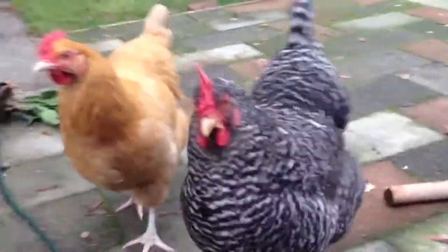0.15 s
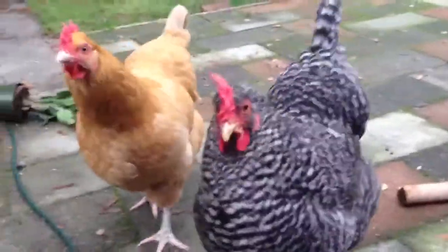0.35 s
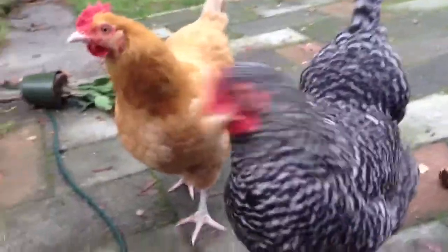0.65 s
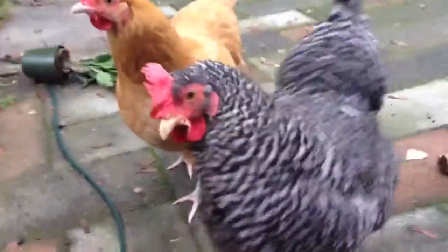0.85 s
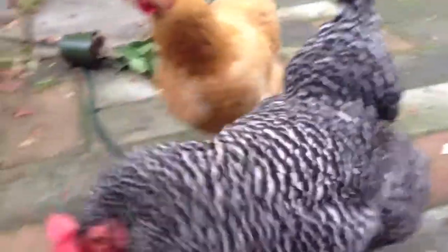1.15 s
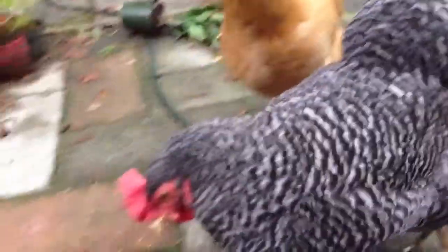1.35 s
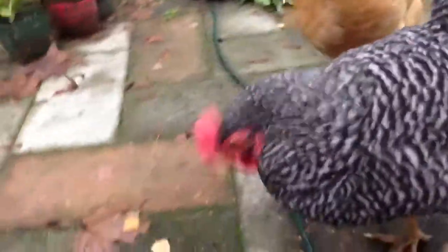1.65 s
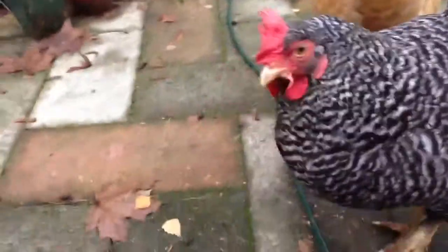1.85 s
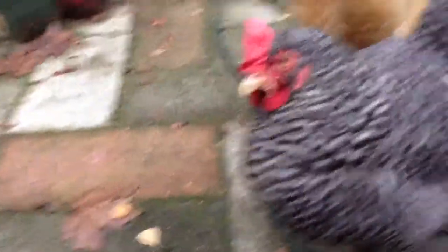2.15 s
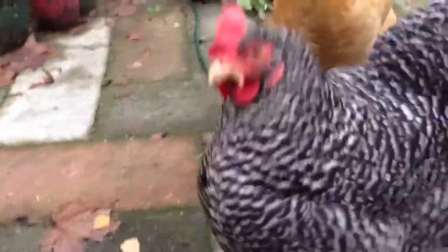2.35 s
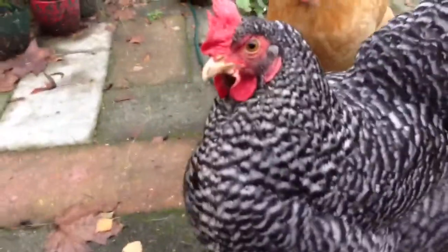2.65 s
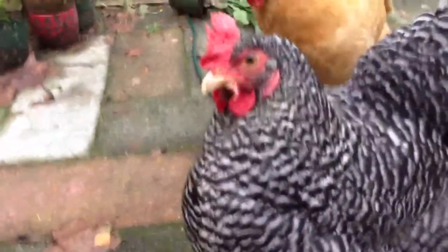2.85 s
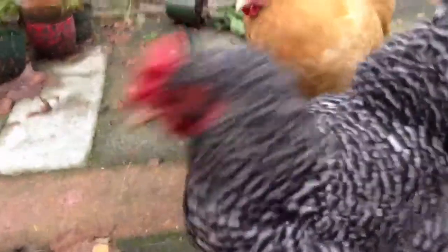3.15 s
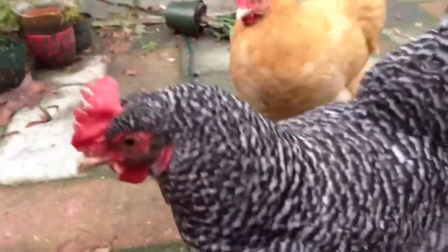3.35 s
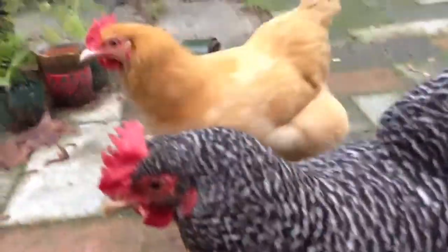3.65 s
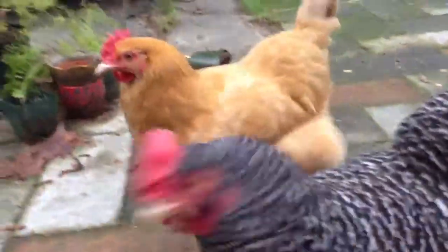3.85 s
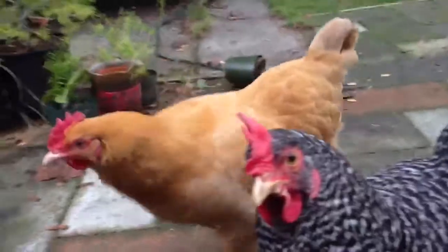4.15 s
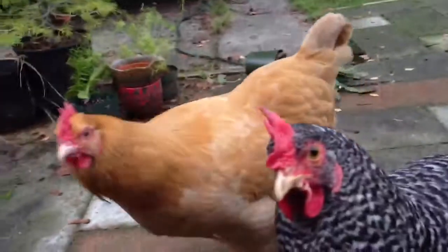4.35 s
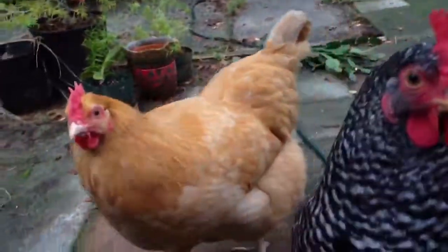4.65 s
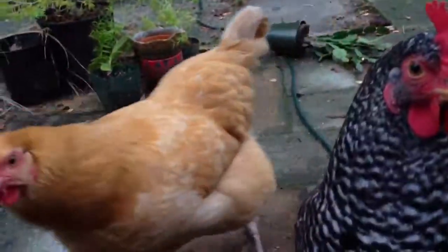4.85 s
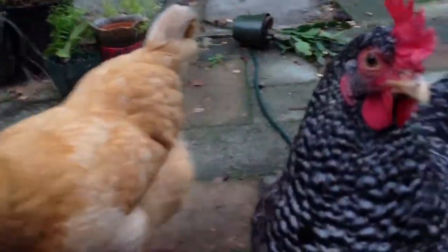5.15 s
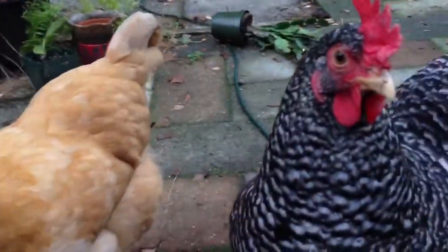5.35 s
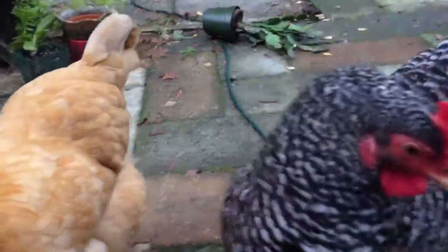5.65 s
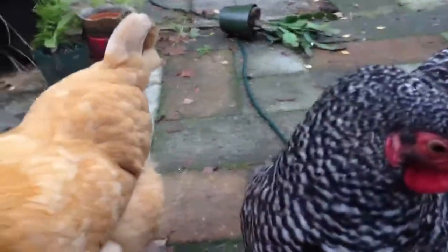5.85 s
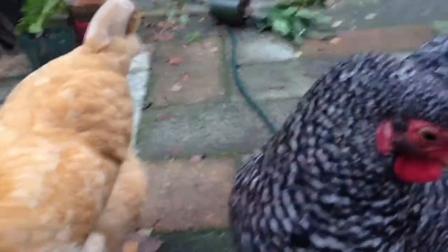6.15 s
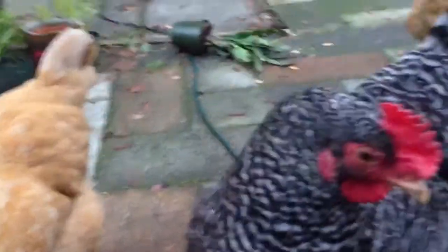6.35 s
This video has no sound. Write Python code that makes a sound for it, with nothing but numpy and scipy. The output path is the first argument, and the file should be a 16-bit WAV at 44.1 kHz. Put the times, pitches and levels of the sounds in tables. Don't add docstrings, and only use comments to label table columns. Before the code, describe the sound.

A close, slightly hissy outdoor sound with low distant traffic rumble throughout. At once a near hen gives a short croaky call of about 0.3 s, sinking, then leaping up and holding. Dry claw and beak ticks on stone follow, with a leaf scuff near 0.5 s, crisp taps around 0.85 s and a dull hollow knock at 1.2 s. From 1.7 to 2.4 s comes a longer croon: a soft warm-up, low creaky croak, voice break, rise and final upward flick, with beak snaps inside it. A faint bird chirp at 2.6 s and a deep soft thud at 2.7 s follow. Sparse ticks continue; from 4.1 to 5.3 s a far hen murmurs weakly, a distant car swells and scuffs cluster. At 5.67 s one hard, loud, breathy cluck snaps and echoes off walls. Quiet returns, with two tiny chirps near 6.2 s and a last tick.

```python
import sys
import numpy as np
from scipy import signal
from scipy.io import wavfile
from scipy.ndimage import uniform_filter1d

SR = 44100
rng = np.random.default_rng(int(sys.argv[2]) if len(sys.argv) > 2 else 0)


def waveform_to_disk(signal):
    frames = np.transpose(np.atleast_2d(signal))
    scaled = np.clip(frames, -1, 1) * 32767
    samples = np.round(scaled).astype(np.int16)
    wavfile.write(sys.argv[1], SR, samples)


def undo_db(level):
    steps = np.asarray(level, float) / 20
    return 10 ** steps


N = 286650


def rms_one(x):
    return x / np.sqrt(np.mean(x ** 2) + 1e-20)


def in_time(rows, first, last):
    s, *columns = np.transpose(rows)
    return [np.interp(np.arange(first, last) / SR, s, c) for c in columns]


def at_hz(points, hz):
    point_hz, point_db = np.transpose(points)
    return np.interp(np.log(hz), np.log(point_hz), point_db)


def drift(rate, size=N):
    r = np.exp(-2 * np.pi * rate / SR)
    return rms_one(signal.lfilter([1], [1, -2 * r, r * r], rng.standard_normal(size + SR))[SR:])


def band(x, low_hz, high_hz):
    edges = [low_hz, min(high_hz, 0.45 * SR)]
    return signal.sosfilt(signal.butter(2, edges, "band", fs=SR, output="sos"), x)


def noise_band(size, low_hz, high_hz):
    return rms_one(band(rng.standard_normal(size), low_hz, high_hz))


def coloured(spectrum, patchy_db, rate):
    out = 0
    edges = 30 * 2 ** np.arange(0, 9.2, 1 / 3)
    white = rng.standard_normal((2, N))
    together, own = drift(rate), drift(3 * rate)
    for k, (low, high) in enumerate(zip(edges, edges[1:])):
        flicker = 0.8 * together + np.roll(own, 9001 * k)
        level_db = at_hz(spectrum, np.sqrt(low * high)) + patchy_db * flicker
        out = out + undo_db(level_db) * band(white[k % 2], low, high)
    return rms_one(out)


def response(modes, hz, order):
    total = 0
    for mid, width, db in modes:
        total = total + undo_db(db) * (1j * hz * width / (mid ** 2 - hz ** 2 + 1j * hz * width)) ** order
    return total


def stack(phase, gains):
    k = np.arange(len(gains))[:, None] + 2
    power = np.sum(np.abs(gains) ** 2, axis=0) / 2
    return np.sum(gains * np.exp(1j * k * phase), axis=0).real / np.sqrt(power)


def held(rows, t, attack_s, release_s):
    start, length = np.array(rows)[:, :1], np.array(rows)[:, 1:2]
    return -20 * np.maximum(0, np.maximum((start - t) / attack_s, (t - start - length) / release_s))


def loudness(rows, t, attack_s, release_s, steady_db=-120):
    level_db = np.array(rows)[:, 2:3] + held(rows, t, attack_s, release_s)
    return np.sqrt(undo_db(steady_db) ** 2 + np.sum(undo_db(level_db) ** 2, axis=0))


def background():
    # (frequency [Hz], density [dB per Hz])
    rumble_colour = [(18, -72), (30, -76.5), (91, -15), (129, 3), (187, 4), (358, -4.5), (456, -5),
                     (737, -14.5), (1050, -15.5), (1460, -55), (2500, -34.5), (3250, -68.5), (5500, -120)]
    rustle_colour = [(1200, 3), (2500, 1.5), (4000, 4), (7000, 1.5), (12000, -3), (16000, -6)]
    hiss_colour = [(760, -35), (1300, -6), (2440, -12), (2710, 1), (4500, -1), (14500, 4), (15400, -9)]
    # (start [s], length [s], level [dB])
    swells = [(0, 0.81, -65.5), (1.45, 2.2, -64.5), (3.4, 0.47, -66.5), (5.35, 0.32, -66), (6.3, 0.23, -60)]
    stirs = [(0, 0.06, -66), (1.05, 0.23, -69), (2.9, 0.1, -75), (3.4, 0.13, -108)]
    hums = [(3.1, 0.43, -81.5), (4.06, 1, -82), (4.87, 0.427, -75.5), (5.44, 0.081, -74.5)]
    hum_hz, hum_width_hz = 1036, 14.5

    t = np.arange(N) / SR
    rumble = loudness(swells, t, 0.62, 0.62, steady_db=-63.5) * coloured(rumble_colour, patchy_db=1.5, rate=3.0)
    rustle = loudness(stirs, t, 0.12, 0.12, steady_db=-68.5) * coloured(rustle_colour, patchy_db=0.7, rate=9.0)
    hum = noise_band(N, hum_hz - hum_width_hz / 2, hum_hz + hum_width_hz / 2)
    hum = loudness(hums, t, 0.08, 0.08, steady_db=-89.5) * hum
    hiss = undo_db(-74) * coloured(hiss_colour, patchy_db=0.2, rate=8.0)
    return rumble + rustle + hum + hiss


def far_car():
    # (start [s], length [s], level [dB])
    passes = [
        (3.6, .3, -76.5),
        (4.5, .55, -70),
        (6.399, .1, -76),
    ]
    gain = loudness(passes, np.arange(N) / SR, 0.9, 0.9, steady_db=-83.5)
    return gain * rms_one(band(band(rng.standard_normal(N), 380, 1010), 292, 1100))


def far_bird():
    # (time [s], length [s], pitch [Hz], rms level [dB])
    chirps = [
        (2.591, 0.014, 6880, -70.5),
        (6.145, .018, 7150, -74),
        (6.297, 0.015, 7100, -67.5),
    ]
    out = np.zeros(N)
    for s, length, hz, level_db in chirps:
        t = np.arange(round(length * SR)) / SR
        note = np.sin(2 * np.pi * hz * t * (1 - 0.012 * t / length))
        out[round(s * SR):][:len(t)] += 2 * undo_db(level_db) * np.sin(np.pi * t / length) * note
    return out


def far_hen():
    # (time [s], length [s], start pitch [Hz], end pitch [Hz], rms level [dB])
    murmurs = [
        (4.134, 0.21, 475, 479, -76),
        (4.397, 0.14, 396, 402, -76.5),
        (4.87, 0.144, 413, 427, -72),
        (5.127, 0.17, 417, 438, -75),
    ]
    out = np.zeros(N)
    k = np.arange(6, 11)[:, None]
    for s, length, start_hz, end_hz, level_db in murmurs:
        hz = np.linspace(start_hz, end_hz, round(length * SR))
        hz = hz * (1 + 0.008 * drift(60.0, size=len(hz)))
        gains = np.abs(response([(3800, 1200, 0)], k * hz, order=2))
        note = np.sum(gains * np.cos(k * 2 * np.pi * np.cumsum(hz) / SR), axis=0)
        out[round(s * SR):][:len(hz)] += undo_db(level_db) * np.sqrt(np.hanning(len(hz))) * rms_one(note)
    return out


def scuffs():
    # (time [s], length [s], rms level [dB], centre [Hz], density [grains per s])
    showers = [(0.474, 0.051, -60.5, 3620, 10000), (1.53, 0.068, -70, 6450, 1700),
               (2.669, 0.047, -66.5, 6100, 2500), (4.104, 0.023, -66, 3300, 3600),
               (4.708, 0.037, -58.5, 4060, 4100), (4.737, 0.038, -60, 4500, 1700),
               (4.8, 0.012, -67.5, 4430, 3500), (5.058, 0.021, -58, 4600, 4400),
               (5.073, 0.019, -57, 4570, 8100)]
    out = np.zeros(N)
    t = np.arange(4000) / SR
    for s, length, level_db, hz, per_s in showers:
        sizes = rng.choice([-1, 1], len(t)) * undo_db(4 * np.minimum(rng.exponential(1, len(t)), 2.5))
        clicks = sizes * (rng.random(len(t)) < per_s / SR)
        grains = band(clicks, hz / 1.15, hz * 1.2)
        grains += 0.3 * band(clicks, hz / 1.9, hz / 1.5)
        grains += 0.45 * band(clicks, hz / 2.2, hz * 1.8)
        out[round(s * SR):][:len(t)] += undo_db(level_db) * np.exp(-(t / length) ** 2) * rms_one(grains)
    return out


def ticks():
    # (time [s], peak level [dB], centre [Hz], width [share of centre], T60 [s]) claws and beaks on stone,
    # some of them during the second croon, then duller knocks
    stone_ticks = [(0.011, -41.5, 6950, 0.34, 0.01), (0.078, -54, 7000, .5, .006),
                   (0.484, -51, 4440, .5, .006), (0.5633, -51, 4300, 0.54, 0.028),
                   (0.6667, -52, 3660, 0.9, 0.0065), (0.851, -40.5, 6000, 0.7, 0.0075),
                   (0.8614, -44, 6500, 0.98, 0.0052), (1.5298, -50, 5960, 0.82, 0.006),
                   (1.555, -50.5, 4750, 0.99, 0.007), (2.6494, -55, 7600, 0.98, 0.0066),
                   (2.674, -63, 6300, 1, 0.0066), (2.692, -44.5, 5700, 0.74, 0.0041),
                   (2.922, -49, 4480, 0.57, 0.006), (3.021, -51, 6860, 0.57, 0.01),
                   (3.7938, -48, 4400, 0.34, 0.005), (4.109, -54, 3370, 0.59, 0.006),
                   (4.5918, -49.5, 4520, .09, 0.014), (4.5918, -53, 2820, .2, .012),
                   (4.7094, -51, 4900, .3, 0.0073), (4.7155, -48, 4110, 0.24, .012),
                   (4.743, -47, 4620, .1, 0.018), (4.7907, -55, 3200, .4, .006),
                   (4.921, -59.5, 2500, .12, .015), (5.0795, -50, 4440, .12, .014),
                   (5.081, -54, 2720, .12, .016), (4.751, -45, 3560, 0.28, 0.0053),
                   (5.0614, -48.5, 4700, .1, .02), (5.1492, -52, 3900, .3, .006),
                   (5.18, -49, 7900, .12, .008), (5.1803, -48, 4000, 0.55, .004),
                   (5.3627, -54, 4800, .12, .01), (6.358, -53, 4750, 0.9, 0.0045),
                   (1.988, -49, 7260, 0.7, 0.0068), (2.0018, -46.5, 7043, 0.38, 0.024),
                  (2.0787, -44, 6550, 0.62, 0.017), (2.177, -34.5, 6435, 0.52, 0.0027),
                  (2.222, -46.5, 5500, 0.36, 0.0061), (2.239, -46, 7080, 0.7, 0.005)]
    knocks = [
        (2.7, -44, 140, .9, .07),
        (1.2, -46, 760, 0.27, 0.025),
        (5.647, -41, 1700, .3, 0.014),
    ]
    out = np.zeros(N)
    t = np.arange(1500) / SR
    for s, peak_db, hz, width, t60 in stone_ticks + knocks:
        spread = 1 + np.clip(width, 0.05, 3)
        crack = rng.standard_normal(len(t)) * undo_db(-60 * t / max(t60, 0.001))
        crack = band(crack, hz / spread, hz * spread)
        out[round(s * SR):][:len(t)] += undo_db(peak_db) * crack / np.abs(crack).max()
    return out


def yard(x):
    # (delay [s], level [dB], smear [s], centre [Hz])
    echoes = [(.004, -19.5, .001, 3080), (.004, -21.5, .001, 4600), (.1, -43, .008, 3000),
              (.15, -47.5, .008, 2980), (0.012, -29.5, 0.0027, 1690), (0.015, -32.5, .006, 4200),
              (0.032, -33, .004, 1870), (0.038, -48.5, 0.0041, 1100), (0.043, -30.5, 0.0049, 2490),
              (0.07, -50, .005, 4000), (.075, -37, .005, 2600), (0.13, -59, 0.0055, 1310),
              (.02, -26, .005, 503), (.058, -39.5, .006, 4100), (.085, -54.5, 0.0071, 1000),
              (.11, -51, .008, 4500), (.135, -45.5, .006, 3000)]
    t = np.arange(SR // 2) / SR
    reply = (rng.random(len(t)) < 9000 / SR) * rng.standard_normal(len(t))
    reply = reply * (t > 0.009) * undo_db(-60 * t / 0.18)
    reply = undo_db(-13) * reply / np.sqrt(np.sum(reply ** 2))
    reply -= 0.46 * band(reply, 850, 1070)
    far = band(rng.standard_normal(len(t)) * (t > 0.05) * undo_db(-60 * t / 0.68), 1300, 5500)
    reply += undo_db(-35.5) * far / np.sqrt(np.sum(far ** 2))
    for delay, level_db, smear, hz in echoes:
        echo = rng.standard_normal(600) * np.exp(-np.arange(600) / SR / smear)
        echo = band(echo, hz / 1.33, hz * 1.13)
        reply[round(delay * SR):][:600] += undo_db(level_db) * echo / np.sqrt(np.sum(echo ** 2))
    return signal.fftconvolve(x, band(reply, 180, 6600))[:N]


def beak_puff():
    # (start [s], length [s], level [dB])
    puffs = [
        (5.6455, 0.0066, -46.5),
        (5.654, 0.012, -51),
        (5.668, 0.021, -37),
    ]
    whistles = [
        (5.656, 0.01, -46.5),
        (5.668, 0.0073, -44),
        (5.682, 0.014, -47.5),
    ]
    first, last = round(5.635 * SR), round(5.73 * SR)
    size, t = last - first, np.arange(first, last) / SR
    whistle_hz = 9340 - 38000 * np.maximum(t - whistles[0][0], 0)
    whistle = drift(620.0, size=size) * np.cos(2 * np.pi * np.cumsum(whistle_hz) / SR)
    broad = noise_band(size, 1300, 4700) + undo_db(-21) * noise_band(size, 7000, 16000)
    out = np.zeros(N)
    out[first:last] += loudness(puffs, t, 0.0011, 0.022) * broad
    out[first:last] += loudness(whistles, t, 0.0076, 0.0076) * whistle
    return out


def cluck():
    # (time [s], pitch [Hz], level [dB])
    course = [(5.6605, 515, -57), (5.664, 509, -22), (5.667, 521, -17), (5.6705, 510, -11.5),
              (5.674, 499, -13), (5.678, 474, -14), (5.682, 470, -33.5), (5.687, 470, -54)]
    # (frequency [Hz], level [dB])
    colour = [(240, -46), (400, -8), (499, -12), (985, 3.5), (1090, 10.5), (1540, -4), (2050, -4),
              (2430, -9), (2750, -15.5), (3000, -3.5), (3780, -7.5), (4550, -1.5), (5000, -8), (6060, -15),
              (7060, -53), (9190, -23), (11000, -63), (14300, -80), (22000, -120)]
    beak_closes_s, closing_db_per_s = 5.676, 450

    first, last = round(course[0][0] * SR), round(course[-1][0] * SR)
    hz, level_db = in_time(course, first, last)
    level_db = uniform_filter1d(level_db, size=90)
    k = np.arange(1, 24)[:, None]
    tilt_db = 0.16 * np.clip(k - 2, 0, 8) * (level_db - level_db.max())
    closing = np.maximum(np.arange(first, last) / SR - beak_closes_s, 0)
    tilt_db -= closing_db_per_s * closing * np.clip(k - 4, 0, 8)
    lag = 0.05 * k + 0.034 * k ** 2
    phase = 2 * np.pi * np.cumsum(hz) / SR
    pulses = np.sum(undo_db(at_hz(colour, k * hz) + tilt_db) * np.cos(k * phase - lag), axis=0)
    husk = 0.22 * noise_band(last - first, 1120, 1430)
    out = np.zeros(N)
    out[first:last] = undo_db(level_db - 10.0) * (pulses + husk)
    return out


def breath(pushes, t):
    level_db = np.array(pushes)[:, 2:3] + held(pushes, t, attack_s=0.0053, release_s=0.007)
    tight_db, beak_db = np.array(pushes)[level_db.argmax(axis=0), 3:].T
    return uniform_filter1d([level_db.max(axis=0), tight_db, beak_db], size=200)


def croon(pitch, pushes):
    # (start [s], end [s], extra roughness [0-1])
    creaks = [(0.191, 0.244, 0.2), (1.79, 1.826, 0.25), (2.1, 2.145, 0.3), (2.145, 2.2, .35)]
    # (centre [Hz], width [Hz], level [dB])
    beak_modes = [(1455, 280, 6), (1645, 125, 11), (1850, 310, 10.5), (2520, 270, 3), (3150, 200, 8.5),
                  (3500, 620, 11), (3860, 230, 0.5), (6000, 350, -4), (8050, 3600, -11)]

    first, last = round(pitch[0][0] * SR), round(pitch[-1][0] * SR)
    size, t = last - first, np.arange(first, last) / SR
    hz, = uniform_filter1d(in_time(pitch, first, last), size=150)
    octaves = np.log2(hz / 250)

    throat_db, tight_db, beak_db = breath(pushes, t)
    chest_db = throat_db - 9 - tight_db
    rasp_db = throat_db - 27 + beak_db
    mouth_db = -19.5 + 0.99 * tight_db + 0.75 * beak_db + 7.7 * octaves
    mouth_db += 25 * uniform_filter1d(1.0 * ((t > 1) & (t < 1.745)), size=400)

    creak = uniform_filter1d(sum(more * ((t > a) & (t < b)) for a, b, more in creaks), size=400)
    usual_rough = 0.21
    rough = usual_rough + 0.13 * np.clip((255 - hz) / 20, 0, 1) + creak
    phase = 2 * np.pi * np.cumsum(hz * (1 + 0.018 * rough * drift(80.0, size=size))) / SR
    strength = undo_db(1.8 * rough * drift(70.0, size=size))
    strength *= 1 + 0.3 * creak * np.cos(phase / 2)

    partials = hz * np.arange(2, 36)[:, None]
    tract = response([(745, 95, 0), (1120, 380, mouth_db)], partials, order=1)
    throat = stack(phase, tract * (partials / 760) ** -0.8 / (1 + (partials / 970) ** 7.2))

    scatter = 2 * np.pi * np.cumsum(hz * 0.009 * drift(150.0, size=size)) / SR
    gap = 1 - response([(2204, 170, 0)], partials, order=1)
    gap *= 1 - response([(2800, 140, 0)], partials, order=1)
    upper_beak = (4400, 540, 1.4 + 6.0 * octaves)
    rasp = stack(phase + scatter, gap * response(beak_modes + [upper_beak], partials, order=2))

    gate = (0.5 + 0.5 * np.cos(phase - 1.0)) ** 2
    white = rng.standard_normal(size)
    air = band(band(white, 2980, 4100), 3130, 4400) + 0.91 * band(band(white, 1400, 1950), 1250, 2200)
    hiss = rms_one(air * gate)
    throat_husk = rms_one(band(band(white, 620, 950), 200, 1160))
    chest_husk = 0.035 * rough / usual_rough * rms_one(band(band(white, 160, 450), 140, 500))

    out = np.zeros(N)
    out[first:last] = undo_db(chest_db) * (np.sqrt(2) * strength * np.cos(phase) + chest_husk)
    out[first:last] += undo_db(throat_db) * (strength * throat + (0.49 * rough + 0.091 * creak) * throat_husk)
    out[first:last] += strength * undo_db(rasp_db) * (0.88 * rasp + (0.25 + 0.3 * rough) * hiss)
    return -out


def first_croon():
    # (time [s], pitch [Hz])
    fall = [(0.0, 345.5), (0.03, 389.3), (0.098, 364.8), (0.11, 333.5), (0.126, 343), (0.16, 271.9),
            (0.184, 283.5), (0.192, 291)]
    leap = [(0.195, 387), (0.213, 404), (0.225, 368), (0.232, 407.5), (0.238, 371), (0.25, 388.5),
            (0.275, 380)]
    # (start [s], length [s], effort [dB], throat tightness [dB], beak opening [dB])
    pushes = [(0, 0.018, -28, 8, -1.5), (0.022, .013, -30, 8, 3.5), (0.035, 0.025, -30.5, 1.5, 0),
              (0.054, 0.0223, -29.5, 2, 1.5), (0.078, 0.012, -30, 9, -6), (0.096, 0.01, -28.5, 12, -6),
              (0.105, 0.017, -32.5, 8, -2), (0.125, 0.019, -30.5, 21, -1), (0.147, 0.035, -33, -1.5, 8),
              (0.186, .01, -36, 8, -5), (0.199, 0.0083, -28.5, 3, -7), (0.214, 0.008, -32, -4, -1),
              (0.216, .004, -31.5, 7, -5), (0.224, 0.0072, -25.5, 7.5, -3.5), (0.235, 0.016, -30.5, 1.5, 3)]
    return croon(fall + leap, pushes)


def second_croon():
    # (time [s], pitch [Hz])
    warm_up = [(1.66, 238), (1.686, 243.2), (1.705, 287), (1.726, 295.3), (1.74, 257.6), (1.772, 251.8),
               (1.79, 217.6), (1.8, 213.4), (1.81, 233)]
    croak = [(1.824, 240.7), (1.833, 218.8), (1.89, 228.5), (1.903, 255.1), (1.957, 233.7), (1.979, 240.7),
             (2.026, 226.4), (2.052, 233), (2.064, 254.4)]
    voice_break = [(2.097, 233.1), (2.108, 280.5), (2.112, 257.3), (2.118, 275.7), (2.123, 255.5),
                   (2.133, 269.4), (2.137, 344.4), (2.15, 328.3), (2.163, 282.7)]
    rise = [(2.181, 365.8), (2.196, 346), (2.206, 391.3), (2.25, 402.2), (2.27, 429), (2.31, 374.2),
            (2.326, 394.7), (2.345, 384.4), (2.361, 422)]
    flick = [(2.371, 532), (2.41, 525)]
    # (start [s], length [s], effort [dB], throat tightness [dB], beak opening [dB])
    pushes = [(1.686, 0.021, -47, -8, -2), (1.712, 0.016, -51.5, -11, -8), (1.727, .011, -39, -4, -6),
              (1.739, 0.036, -37.5, 13, -16), (1.764, .006, -36.5, 1, -15), (1.771, 0.0038, -31.5, -3, -10),
              (1.776, 0.0076, -26.5, 4, -5), (1.783, 0.0098, -31.5, -1.5, -6), (1.803, .01, -40, -9, -15),
              (1.816, .005, -37, -8, -12), (1.821, 0.066, -32, -2, -6), (1.873, 0.025, -29.5, 1.5, -4.5),
              (1.902, 0.047, -28.5, 6, -4.5), (1.936, 0.019, -27.5, -1, 0.5), (1.956, 0.12, -31, -3, 1),
              (2.065, 0.027, -27.5, 4, 7), (2.087, 0.016, -27.5, -1.5, 4),
              (2.106, 0.019, -32.5, -0.5, 10.5), (2.124, 0.0035, -28.5, -2, 9),
              (2.128, 0.0067, -28.5, 16, 8), (2.134, 0.0045, -28.5, 24, -1), (2.14, 0.041, -32.5, 7, 0),
              (2.179, 0.03, -28.5, 17, -2.5), (2.214, 0.019, -27.5, 4.5, -4), (2.237, 0.028, -33, 0, -3),
              (2.275, 0.0063, -33.5, -2, 0), (2.282, 0.0054, -28.5, 4, -7), (2.288, .008, -25, 5, -6),
              (2.296, 0.017, -25, 9, -0.5), (2.311, 0.0058, -27, 1, -8), (2.319, 0.024, -27.5, 9, 0),
              (2.34, 0.02, -30.5, -1.5, 3), (2.369, 0.0071, -37.5, -8.5, -2)]
    return croon(warm_up + croak + voice_break + rise + flick, pushes)


def scene():
    near = first_croon() + second_croon()
    sharp = cluck() + beak_puff()
    voices = near + sharp + yard(undo_db(-9.5) * near + sharp)
    contacts = ticks() + scuffs()
    garden = background() + far_car() + far_bird() + far_hen()
    return (voices + contacts + garden)[None]


def band_limit(x):
    return signal.sosfilt(signal.butter(12, 15340, fs=SR, output="sos"), x)


def record(dry):
    thin = signal.sosfilt(signal.butter(2, 75, "high", fs=SR, output="sos"), dry)
    return band_limit(thin)


dry = scene()
out = record(dry)
waveform_to_disk(out)
```